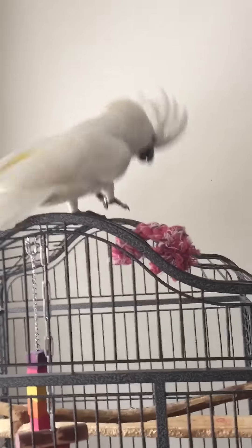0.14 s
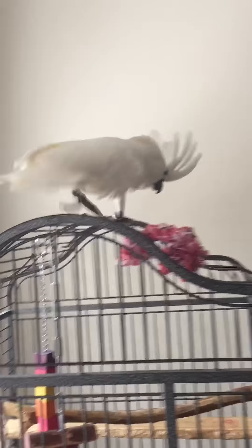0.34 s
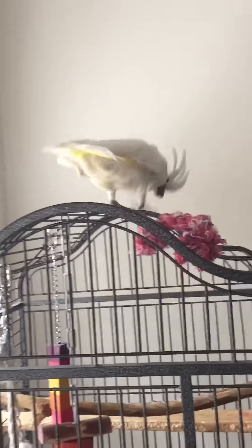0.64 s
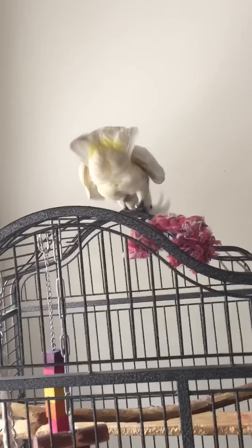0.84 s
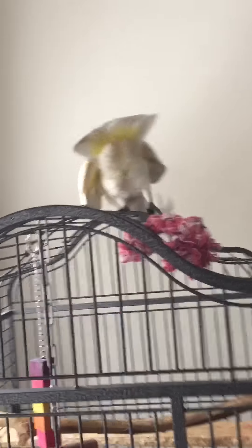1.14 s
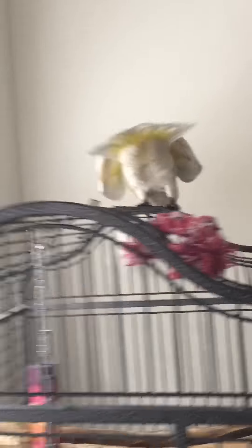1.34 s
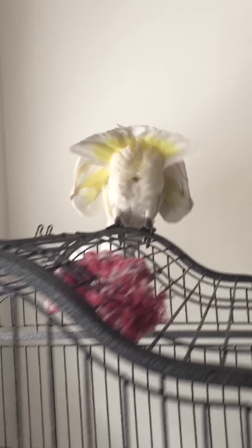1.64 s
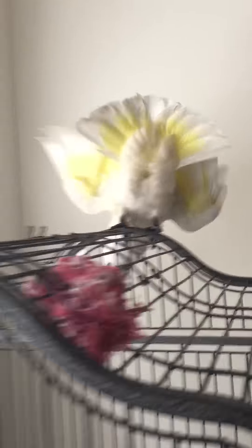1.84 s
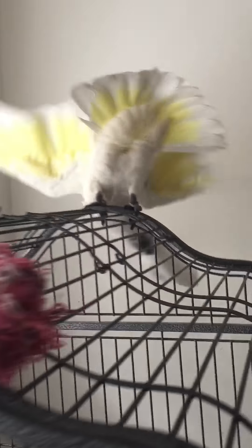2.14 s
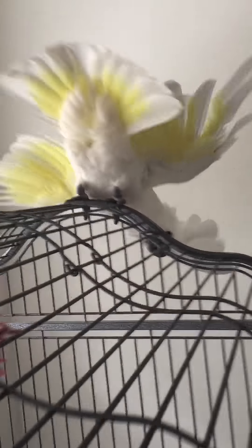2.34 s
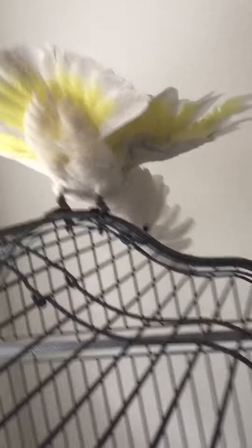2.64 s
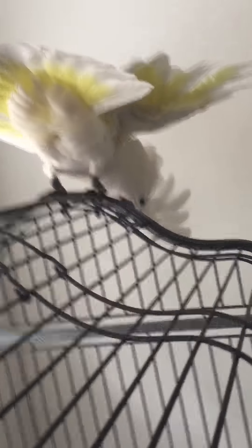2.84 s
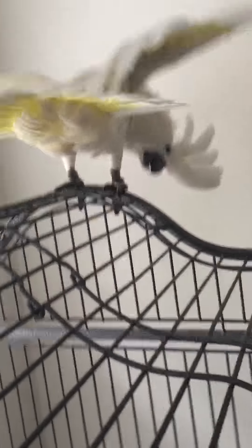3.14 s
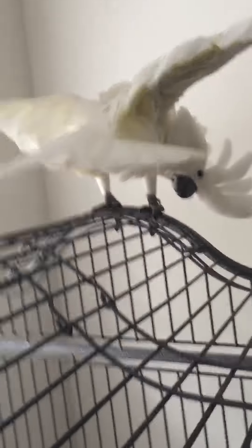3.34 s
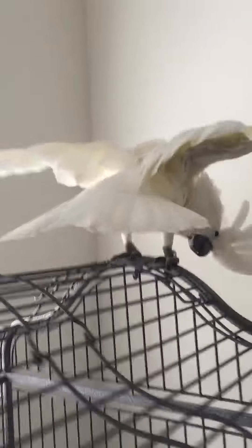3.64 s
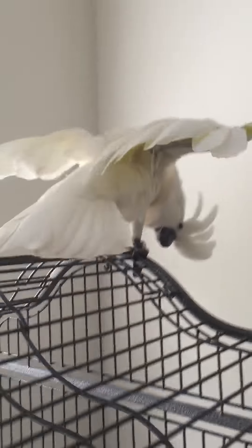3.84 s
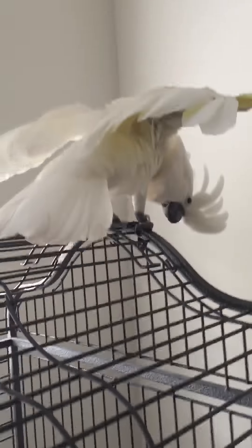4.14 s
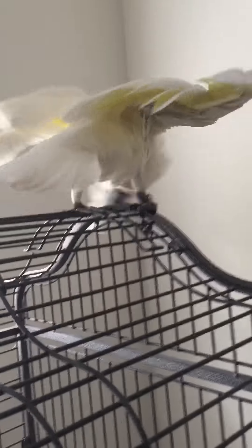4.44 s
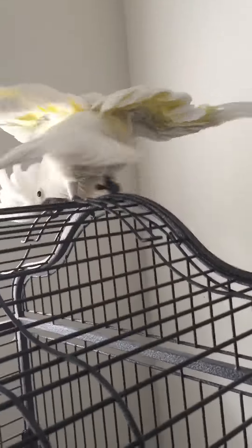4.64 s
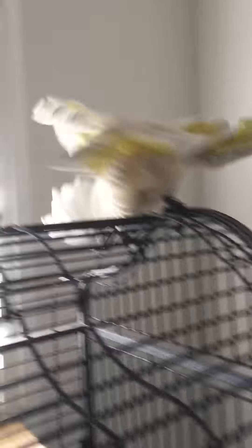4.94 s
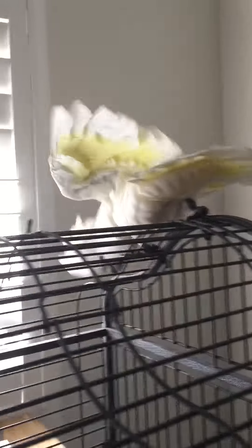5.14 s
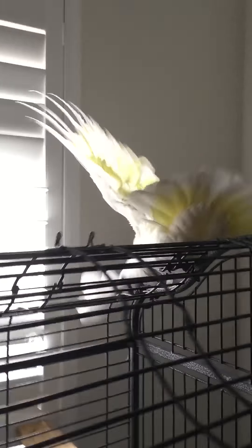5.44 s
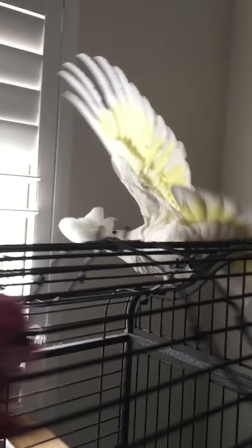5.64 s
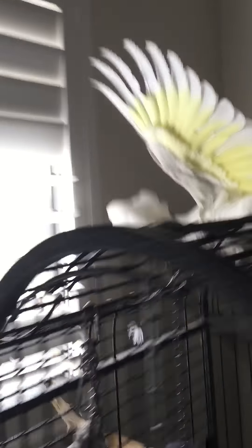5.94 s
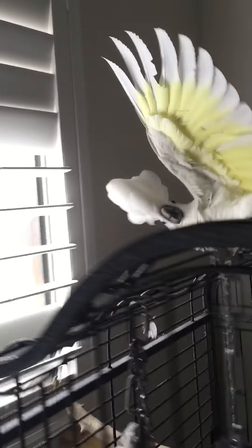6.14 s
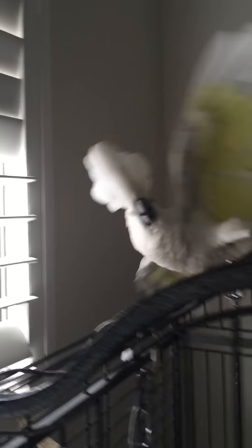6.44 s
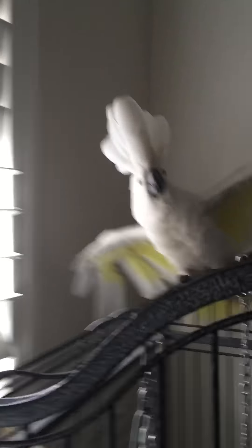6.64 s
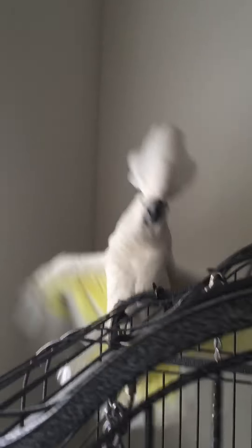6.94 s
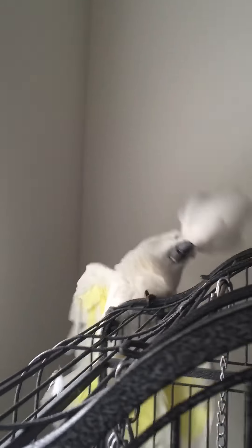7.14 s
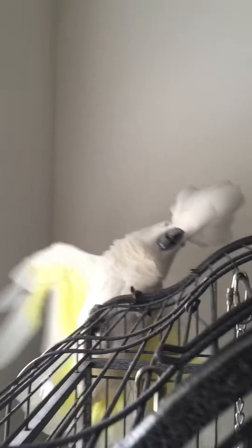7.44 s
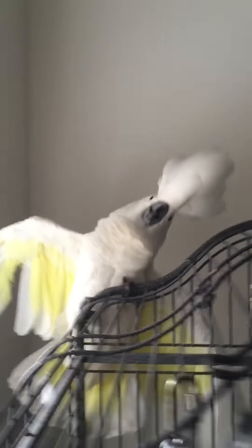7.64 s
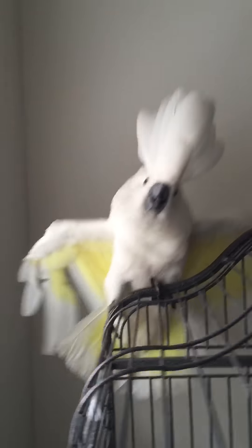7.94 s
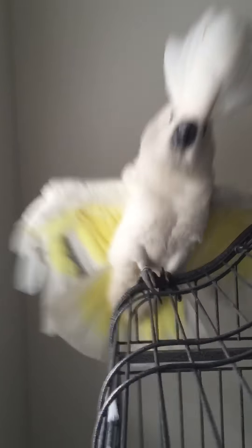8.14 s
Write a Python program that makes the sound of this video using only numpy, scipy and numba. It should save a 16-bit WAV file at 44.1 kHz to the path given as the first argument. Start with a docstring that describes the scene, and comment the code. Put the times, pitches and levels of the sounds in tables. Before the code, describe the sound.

The end of a very loud, rough cockatoo scream stops at once and its echo fades in a small hard-walled room. Then come fifteen short raspy hisses, roughly two a second, the first ending in a tiny squeak. Claws tick on ringing cage wires, feathers rustle softly, and dull knocks come late. Close handheld microphone, low room rumble beneath.

```python
"""A small, hard-walled room, where a cockatoo displays on top of its wire cage.
A harsh scream, pulses through throat resonances, breaks off and rings in the room.
Fifteen raspy hisses follow, fluttering noise shaped by throat and beak; the first ends in a squeak.
Claws tick on ringing wires, wings rustle as grainy noise, and three soft croaks glide in pitch.
Three dull knocks sound as damped modes, over a low rumble of coloured noise, wavering hums and faint air."""
import sys
import numpy as np
from scipy import signal
from scipy.fft import rfft, irfft
from scipy.io import wavfile
from numba import njit

SR = 44100
rng = np.random.default_rng(int(sys.argv[2]) if len(sys.argv) > 2 else 0)


def file_out(sig):
    """Save sig as 16-bit WAV at sys.argv[1]."""
    # one column per channel
    cols = np.atleast_2d(sig).T
    # limit, then scale
    lim = np.clip(cols, -1, 1)
    pcm = np.round(lim * 32767).astype(np.int16)
    wavfile.write(sys.argv[1], SR, pcm)


N = 365148
TIME = np.arange(N) / SR

# Hisses: start t/s, end t/s, crest position (share of length), crest effort level/dB,
# lead-in level/dB under the crest, sag to the end level/dB,
# throaty low part level/dB re effort, airy top level/dB re effort, airy change start to end level/dB,
# throat f/Hz, beak f/Hz, beak level/dB, edge whistle f/Hz, its level/dB, upper whistle f/Hz, its level/dB
HISS_GESTURES = [ (0.888, 1.003, 0.55, -26, 25, 2, -10.5, -7, -9, 3220, 5270, -7, 8800, 8, 12500, -9),
                 (1.287, 1.407, 0.42, -25.5, 12.5, -0.5, -15.5, -15.5, 11, 3360, 5450, -3, 9200, 9, 12700, 4),
                 (1.642, 1.806, 0.83, -30.5, 8.5, 6.5, -16, -10.5, 2, 3830, 5200, 6.5, 10300, 9, 13100, 12),
                 (2.066, 2.229, 0.67, -23.5, 17, 4.5, -13.5, -12.5, -7, 3060, 5670, 4, 9400, 13, 12300, 24.5),
                 (2.475, 2.644, 0.36, -27, 17, 2.5, -14, -11.5, -7, 4000, 5630, 7, 9600, 5, 12000, 6),
                 (3.054, 3.287, 0.16, -29.5, 33, -0.5, -13, -12.5, 11, 3760, 5160, 1, 9900, 7, 11100, 14),
                 (3.659, 3.853, 0.34, -30, 26, 4, -14, -9, -18, 4080, 5060, 6.5, 9400, 3, 11100, 8),
                 (4.331, 4.556, 0.47, -32.5, 10.5, -0.5, -8.5, -6.5, -4.5, 4200, 5650, -4, 8700, -2, 12100, -7),
                 (4.976, 5.122, 0.45, -27, 9.5, 7.5, -9, -10.5, -2, 3850, 5330, 6, 8700, 9, 12100, 4),
                 (5.535, 5.676, 0.83, -31, 6, 8.5, -8.5, -5.5, 8, 4040, 6300, -13, 9600, 13, 12900, 11),
                 (6.054, 6.19, 0.5, -27.5, 16.5, 10, -7.5, -8.5, -5, 4400, 5480, 8, 9300, 14, 12400, 8),
                 (6.379, 6.557, 0.38, -26, 26.5, 6.5, -8, -6, -6, 4720, 5840, 4, 9600, -2, 12800, 0),
                 (6.938, 7.11, 0.3, -27.5, 8.5, 0.5, -8, -10, -1, 3730, 5090, 9, 9350, 9, 12900, 12),
                 (7.411, 7.655, 0.58, -29.5, 7.5, 6.5, -11, -12, -3, 4400, 5140, 3, 9100, 0, 12800, 5),
                 (7.999, 8.147, .26, -26.5, 30, 2, -12, -11.5, -18, 4160, 5200, -4, 8350, -3, 12300, -16)]
# Colour of the air noise in the open throat and beak: f/Hz, level/dB per Hz
THROAT_COLOUR = [(400, -18), (700, -14.5), (1000, -6.5), (1800, -2), (2200, -1.5), (2700, 2), (4400, 5),
                 (4900, -3), (6000, -0.5), (7000, -8.5), (7900, -17), (9300, -10), (14300, -15),
                 (15600, -11)]
# Throat resonances of the scream: f/Hz, width f/Hz, level/dB
SCREAM_RESONANCES = [(1100, 240, -8), (1740, 220, 1), (2024, 250, 1), (2550, 360, -5), (3340, 430, -8.5),
                     (4340, 460, -11.5), (5650, 270, -14), (9900, 6500, -28.5)]
# Short croaks: start t/s, length t/s, first pitch f/Hz, last pitch f/Hz, level/dB, brightness cutoff f/Hz
CROAK_NOTES = [(0.219, 0.022, 519, 593, -32.5, 1200), (0.24, 0.0136, 550, 1290, -33, 1210),
               (2.07, 0.051, 541, 488, -41, 3600)]
# Claws on the bars: start t/s, level/dB before the common lift,
# body level/dB re that (values above 0 act as 0), skid decay t/s
CLAW_TICKS = [(0.3297, -39.5, 2, 0.007), (0.3513, -31, 0.5, 0.0058), (0.4297, -30.5, -2, 0.0046),
              (0.56, -38, -13, 0.013), (0.644, -33, -4, 0.0087), (0.792, -20.5, -15, 0.0061),
              (4.647, -34.5, -1, 0.0043), (4.8526, -34.5, -21, 0.0069), (4.877, -29.5, -27, 0.0081),
              (5.2438, -33, 4, 0.0056), (5.272, -33.5, -1, 0.0065), (5.471, -45, -23, 0.006),
              (6.6155, -20, -36, 0.004), (6.779, -33.5, 13, 0.0078), (6.8526, -43, 2, 0.0069),
              (6.88, -24.5, -8.5, 0.0077)]
# Ringing modes of the cage wire: f/Hz, level/dB, t60 t/s before the foot's damping
WIRE_MODES = [(3860, -5, 0.3), (4950, -19, .1), (6750, -21, .25), (6860, -8, .16), (8150, -1, 0.2),
              (8400, -22, .3), (10040, -21, .3), (10800, -14, .1), (11300, -19, 0.17), (12700, -16, .12),
              (13660, -20, .3)]
# Colour of a claw's crack: f/Hz, level/dB per Hz
CRACK_COLOUR = [(700, -33), (1500, -3.5), (4000, 0.5), (7000, -4), (9000, -1.5), (11500, -0.5), (14000, -2),
                (15800, -6)]
# Wing rustles: middle t/s, half length t/s, level/dB
WING_RUSTLES = [(0.609, 0.05, -43.5), (0.886, 0.11, -40.5), (1.98, 0.24, -57), (2.448, 0.047, -60),
                (3.637, 0.075, -49.5), (6.608, 0.0085, -40), (4.928, 0.063, -46.5), (5.29, 0.056, -41),
                (5.453, 0.13, -50), (5.797, 0.042, -72), (6.813, 0.024, -48), (6.918, 0.018, -49),
                (7.226, 0.086, -51), (7.86, 0.028, -50), (8.27, .015, -56)]
# Colour of sliding feathers: f/Hz, level/dB per Hz
FEATHER_COLOUR = [(300, 3), (900, -1.5), (2500, -0.5), (5000, -5), (7500, -6.5), (10000, -8), (15800, -12)]
# Dull knocks: start t/s, level/dB, ring length (factor on the body's t60)
KNOCK_HITS = [(5.879, -34, 0.89), (5.8844, -28.5, 0.78), (6.0008, -31, 0.28)]
# Modes of the knocked body: f/Hz, level/dB, t60 t/s before the ring-length factor
KNOCK_MODES = [(657, 0, 0.039), (970, 2, 0.023), (1510, -5, 0.014), (2250, -6, 0.019), (3450, -7, 0.013)]
# Colour of the room rumble: f/Hz, level/dB per Hz
RUMBLE_COLOUR = [(12, -77), (20, -14), (35, -19.5), (59, 0), (91, -4), (206, -7), (260, -9.5), (323, -11.5),
                 (373, -16), (409, -17.5), (608, -17.5), (665, -25), (1080, -23), (1160, -67), (1500, -28),
                 (1950, -67), (3300, -120)]
# Hums in the rumble: f/Hz, rms level/dB before the swell
RUMBLE_HUMS = [(64, -67), (200, -54), (236, -53)]
# Swell of the deepest rumble: t/s, level/dB
RUMBLE_SWELL = [(0, -4), (1.2, -1), (2.8, 1), (4.3, 0), (5.2, 0), (6.6, 0), (7.3, 1.5), (7.8, 4),
                (8.28, -1)]
# Colour of the faint air: f/Hz, level/dB per Hz
AIR_COLOUR = [(400, -13), (900, -4.5), (1600, 4), (3000, -11.5), (6000, -19.5), (10000, -21), (15800, -25)]
# Ring of the room: f/Hz, t60 t/s, level/dB
ROOM_RING = [(300, 0.46, -4), (930, 0.6, 2.5), (1950, 0.82, -4.5), (4020, 0.57, 1.5), (6000, 0.53, 1),
             (8750, 0.36, 0.5), (15000, 0.21, 4)]


def hisses(echo, rise_s=0.0099, fall_s=0.0074):
    """Turbulent air, chopped by irregular flutter, sounds the throat and beak, set anew for each hiss."""
    out = np.zeros(N)
    t = TIME[:SR // 3] - .04    # leaves 40 ms for the onset to swell in
    for gesture in HISS_GESTURES:
        start_s, end_s, crest, crest_db, lead_db, sag_db, *colour = gesture
        throaty_db, airy_db, airy_change_db, *mouth = colour
        length_s = end_s - start_s
        effort = blowing(t, length_s, crest, crest_db, lead_db, sag_db)
        past_middle = np.clip(t / length_s, 0, 1) - .5
        throaty = throaty_db + 4.5 * past_middle    # the throaty part grows 4.5 dB through every hiss
        airy = airy_db + airy_change_db * past_middle

        jet = noise(THROAT_COLOUR, len(t))
        jet = jet * from_db(1.46 * drift(300, len(t)))    # rasp, in dB
        jet = flutter(jet, depth=.8, period_s=.0026, slide=.07)
        voice = mouth_resonances(jet, effort, mouth)

        low = rms_one(butter(voice, 1940, "low", order=4)) * from_db(throaty)
        # the beak cavity passes little above its own resonance
        beak_hz = mouth[1]
        middle = rms_one(butter(voice, [2150, 1.166 * beak_hz], "band", order=4))
        top = rms_one(butter(voice, 7430, "high", order=4)) * from_db(airy)

        # the flow swells in, the middle band first, and is cut off at the end
        swell = np.exp(np.minimum(t - rise_s / 2, 0) / rise_s)
        valve = swell * np.exp(-np.maximum(t - length_s, 0) / fall_s)
        hiss = (middle + swell * (low + top)) * from_db(effort) * valve
        # the bird moves, so each hiss meets the near walls differently
        hiss = np.pad(hiss, (0, SR // 2))
        add(out, start_s + t[0], in_room(hiss, echo, wet_db=-8.0, wall_db=-11))
    return out


def blowing(t, length_s, crest, crest_db, lead_db, sag_db):
    """Effort of a hiss in dB: a soft lead-in, a push up to the crest, a steady sag and a slight waver."""
    push_s = 0.048    # time scale of the push
    crest_s = crest * length_s
    push = np.exp(-(np.minimum(t - crest_s, 0) / push_s) ** 2)
    spent = np.clip((t - crest_s) / (length_s - crest_s), 0, 1)
    waver_db = 1.0 * drift(34.3, len(t))
    return crest_db - lead_db * (1 - push) - sag_db * spent + waver_db


def flutter(x, depth, period_s, slide):
    """The loose syrinx membrane half repeats the flow after a sliding period: rough streaks come and go."""
    lag = period_s * SR * (1 + slide * drift(44.96, len(x)))
    at = np.arange(len(x))
    return x + depth * np.interp(at - lag, at, x)


def mouth_resonances(jet, effort, mouth):
    """Resonances rise as the beak opens with effort, and wander with the tongue."""
    throat_hz, beak_hz, beak_db, edge_hz, edge_db, upper_hz, upper_db = mouth
    peaks = [(throat_hz, 450, -4.0), (beak_hz, 450, beak_db),
             (edge_hz, 650, edge_db), (upper_hz, 1000, upper_db)]    # Hz, width in Hz, dB
    opening = 0.0027 * (effort - effort.max() + 3)
    voice = jet
    for hz, width_hz, db in peaks:
        centre_hz = hz * (1 + opening + 0.046 * drift(22.1, len(jet)))
        gain = from_db(db + 2.4 * drift(45.3, len(jet)))
        voice = voice + gain * resonance(jet, centre_hz, width_hz)
    return voice


def scream(echo, level_db=-9.5, stop_s=0.0045, release_s=0.0039, pitch_hz=390, jitter=.13, breath=0.55):
    """Chaotic syrinx pulses through the throat; the call is already under way and has filled the room."""
    lead = SR // 8    # samples of call before the scene opens
    t = (np.arange(SR + lead) - lead) / SR
    cycles = np.cumsum(pitch_hz * (1 + jitter * drift(500, len(t)))) / SR
    clicks = np.diff(np.floor(cycles), prepend=0)    # one click per completed cycle
    pulses = rms_one(clicks * from_db(5.7 * drift(200, len(t))))
    source = pulses + breath * rng.standard_normal(len(t))

    voice = np.zeros(len(t))
    for k, (hz, width_hz, db) in enumerate(SCREAM_RESONANCES):
        polarity = (-1) ** k
        voice += polarity * from_db(db) * resonance(source, hz, width_hz)
    voice = butter(voice, 790, "high", order=8)
    voice = rms_one(butter(voice, 6400, "low", order=1))

    call = from_db(level_db) * voice * np.exp(-np.maximum(t - stop_s, 0) / release_s)
    out = np.zeros(N)
    add(out, 0, in_room(call, echo, wet_db=-5, wall_db=-11.5)[lead:])
    return out


def squeak(start_s=1.001, length_s=0.011, pitch_hz=2570):
    """The syrinx catches for an instant: a rough low note, then a near sine over a growl."""
    t = TIME[:SR // 20]
    pitch = pitch_hz * (1 + 0.026 * drift(400, len(t)))
    tone = rms_one(np.sin(2 * np.pi * np.cumsum(pitch) / SR))
    growl = rms_one(butter(rng.standard_normal(len(t)), [750, 1900], "band"))
    shape = np.minimum(t / 0.0011, 1) / (1 + (t / length_s) ** 12)
    low_note = rms_one(resonance(rng.standard_normal(len(t)), 1570, 70)) * np.hanning(len(t))
    out = np.zeros(N)
    add(out, start_s, from_db(-21) * shape * (tone + from_db(-6) * growl))
    add(out, start_s - .033, from_db(-33) * low_note)
    return out


def croaks(jitter=0.046):
    """Brief, soft voiced notes of the syrinx: nine harmonics, gliding in pitch."""
    out, t = np.zeros(N), TIME[:SR // 10]
    for s, length_s, first_hz, last_hz, db, bright_hz in CROAK_NOTES:
        glide = np.interp(t, [0, length_s], [first_hz, last_hz])
        pitch = glide * (1 + jitter * drift(300, len(t)))
        phase = 2 * np.pi * np.cumsum(pitch) / SR
        harmonics = sum(np.cos(k * phase) for k in range(1, 10))
        note = rms_one(butter(harmonics, bright_hz, "low", order=4))
        arch = np.sqrt(np.abs(np.sin(np.pi * np.minimum(t / length_s, 1))))
        add(out, s, from_db(db) * note * arch)
    return out


def claws(lift_db=2.5, ring_db=-17, longest_ring_s=.28, bite_s=0.0016, snap_db=8, snap_s=0.00086):
    """A claw snaps onto a bar, skids briefly and rings the wires; the foot damps the long rings."""
    out, t = np.zeros(N), TIME[:SR // 2]
    for s, peak_db, body_db, skid_s in CLAW_TICKS:
        grit = from_db(4.5 * np.clip(drift(1560, len(t)), -1.5, 1.5))
        skid = noise(CRACK_COLOUR, len(t)) * np.exp(-t / skid_s) * grit
        bar = 1 + 0.0202 * rng.standard_normal()    # no two bars are tuned quite alike
        ring = np.zeros(len(t))
        for hz, db, t60 in WIRE_MODES:
            strength_db = db + rng.normal(0, 3)    # each contact excites a mode anew
            decay_db = 60 * t / min(t60, longest_ring_s)
            ring += from_db(strength_db - decay_db) * np.sin(2 * np.pi * hz * bar * t)
        tick = (skid + from_db(ring_db) * ring) * (1 - np.exp(-t / bite_s))
        tick = tick + from_db(snap_db) * noise(CRACK_COLOUR, len(t)) * np.exp(-t / snap_s)
        body = butter(tick, 3100, "low") * from_db(min(body_db, 0))
        add(out, s, from_db(peak_db + lift_db) * (butter(tick, 6000, "high") - body))
    return out


def wings(grain_db=1.5):
    """Feathers slide over each other in grainy swells of noise."""
    swell = sum(from_db(db) * np.exp(-((TIME - s) / half_s) ** 2) for s, half_s, db in WING_RUSTLES)
    return swell * noise(FEATHER_COLOUR, N) * from_db(grain_db * drift(300, N))


def knocks():
    """Soft contacts on a well damped body, which a lingering touch damps further."""
    out, t = np.zeros(N), TIME[:SR // 8]
    for s, db, ring in KNOCK_HITS:
        thud = np.zeros(len(t))
        for hz, mode_db, t60 in KNOCK_MODES:
            thud += from_db(mode_db - 60 * t / (t60 * ring)) * np.sin(2 * np.pi * hz * t)
        add(out, s, from_db(db) * thud)
    return butter(out, 4500, "low", order=4)


def background(rumble_db=-43.5, air_db=-59, waver=0.58):
    """Low noise rumble with wavering hums, its deepest part swelling slowly, under faint airy noise."""
    rumble = from_db(rumble_db) * butter(noise(RUMBLE_COLOUR, N), 1380, "low", order=4)
    for hz, db in RUMBLE_HUMS:
        tone = np.sin(2 * np.pi * hz * TIME + drift(5.4, N))
        rumble = rumble + from_db(db) * rms_one(tone * (1 + waver * drift(7, N)))
    swell = from_db(np.interp(TIME, *np.transpose(RUMBLE_SWELL)))
    deepest = butter(rumble, 130, "low", order=1)
    return rumble + (swell - 1) * deepest + from_db(air_db) * noise(AIR_COLOUR, N)


def room_echo(build_s=0.0042):
    """The diffuse answer of the room: noise dying band by band; unit energy."""
    t, edges = TIME[:SR], np.geomspace(150, 19000, 15)
    knots, t60s, levels = np.transpose(ROOM_RING)
    echo = np.zeros(SR)
    for low, high in zip(edges, edges[1:]):
        log_centre = np.log(low * high) / 2
        t60 = np.interp(log_centre, np.log(knots), t60s)
        db = np.interp(log_centre, np.log(knots), levels)
        band = butter(rng.standard_normal(SR), [low, high], "band")
        echo += band * from_db(db - 60 * t / t60)
    echo = echo * (1 - np.exp(-t / build_s))
    return echo / np.sqrt(np.sum(echo ** 2))


def in_room(x, echo, wet_db, wall_db):
    """Direct sound, five reflections from the near corner and the room's ring, at unit energy."""
    response = from_db(wet_db) * echo
    response[0] += 1
    for lag_s in rng.uniform(.002, .014, 5):
        response[round(lag_s * SR)] += from_db(wall_db)
    return signal.fftconvolve(x, response / np.sqrt(np.sum(response ** 2)))[:len(x)]


def from_db(db):
    """Decibels to gain."""
    return 10 ** (np.asarray(db) / 20)


def rms_one(x):
    """Scale to unit rms."""
    return x / np.sqrt(np.mean(x ** 2) + 1e-20)


def at_hz(points, hz):
    """Read a table on a log-frequency axis."""
    knots, values = np.transpose(points)
    return np.interp(np.log(hz + 1e-9), np.log(knots), values)


def noise(spectrum, size):
    """Noise of a given colour, falling away under its lowest point; rms 1."""
    hz = np.fft.rfftfreq(size, 1 / SR)
    gain = from_db(at_hz(spectrum, hz)) * np.minimum(hz / spectrum[0][0], 1) ** 2
    return rms_one(irfft(rfft(rng.standard_normal(size)) * gain, size))


def drift(rate, size):
    """Random wander of rms 1: straight lines between new values, rate of them a second."""
    steps = np.arange(size) * rate / SR
    return rms_one(np.interp(steps, np.arange(size), rng.standard_normal(size)))


def butter(x, hz, kind, order=2):
    """Causal Butterworth filter."""
    return signal.sosfilt(signal.butter(order, hz, kind, fs=SR, output="sos"), x)


def resonance(x, hz, width_hz):
    """Resonance at a steady or gliding pitch."""
    angle = 2 * np.pi * hz / SR * np.ones(len(x))
    return moving_resonance(x, angle, np.exp(-np.pi * width_hz / SR))


@njit
def moving_resonance(x, angle, r):
    """Two-pole resonance whose centre (radians a sample) moves; gain about 1 at its peak."""
    y = np.zeros(len(x))
    for i in range(2, len(x)):
        drive = (1 - r * r) / 2 * (x[i] - x[i - 2])
        y[i] = drive + 2 * r * np.cos(angle[i]) * y[i - 1] - r * r * y[i - 2]
    return y


def add(track, s, sound):
    """Mix a sound in at a time in seconds."""
    start = round(s * SR)
    track[start:start + len(sound)] += sound[:len(track) - start]


def scene():
    """Bird and cage share one room."""
    echo = room_echo()
    notes = in_room(squeak() + croaks(), echo, wet_db=-6.0, wall_db=-24.0)
    cage = in_room(claws(), echo, wet_db=5.5, wall_db=-6.5)
    feathers = in_room(wings(), echo, wet_db=-1.0, wall_db=-5.0)
    bumps = in_room(knocks(), echo, wet_db=-9.5, wall_db=-18)
    mix = hisses(echo) + scream(echo) + notes + cage + feathers + bumps + background()
    return mix[None]


def record(dry):
    """The highest peaks are rounded and the treble is cut steeply above 15750 Hz."""
    top_cut = signal.ellip(12, .1, 90, 15750, fs=SR, output="sos")
    return signal.sosfilt(top_cut, np.tanh(dry))


dry = scene()
out = record(dry)
file_out(out)
```